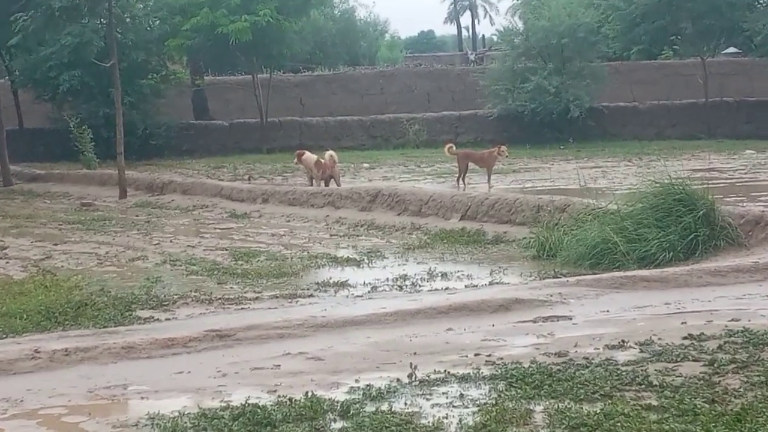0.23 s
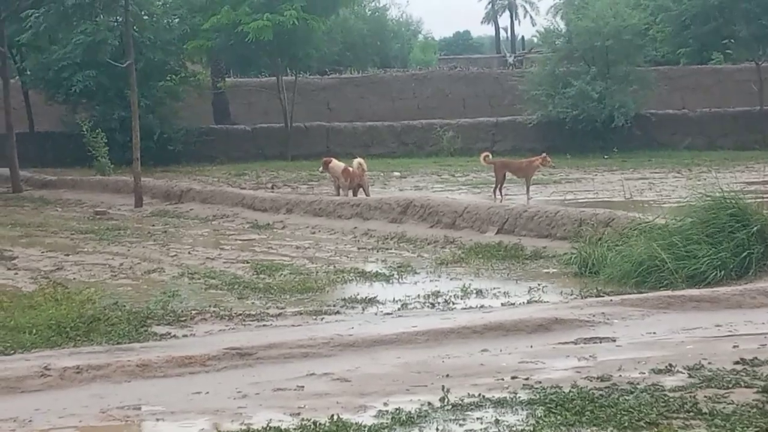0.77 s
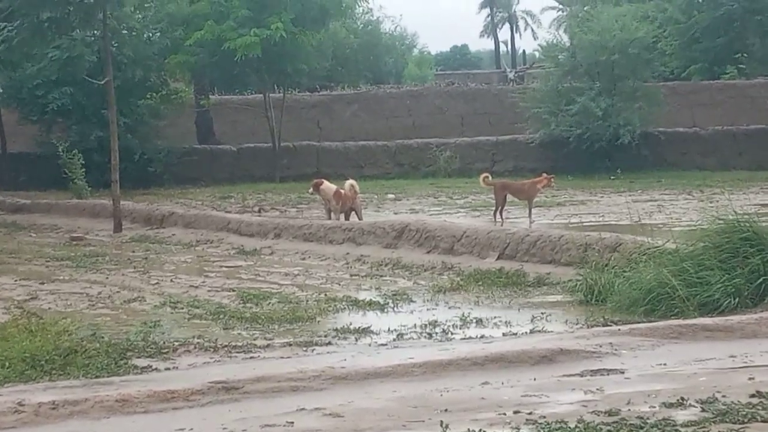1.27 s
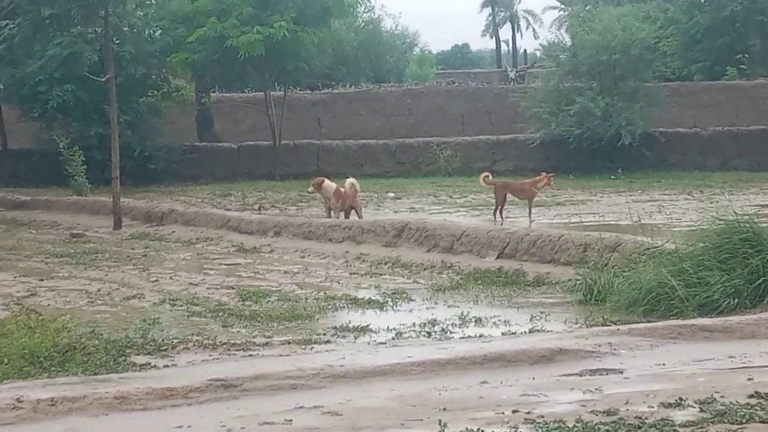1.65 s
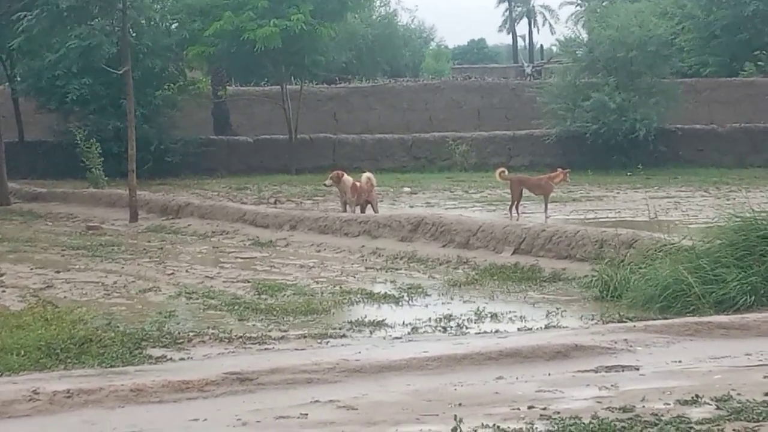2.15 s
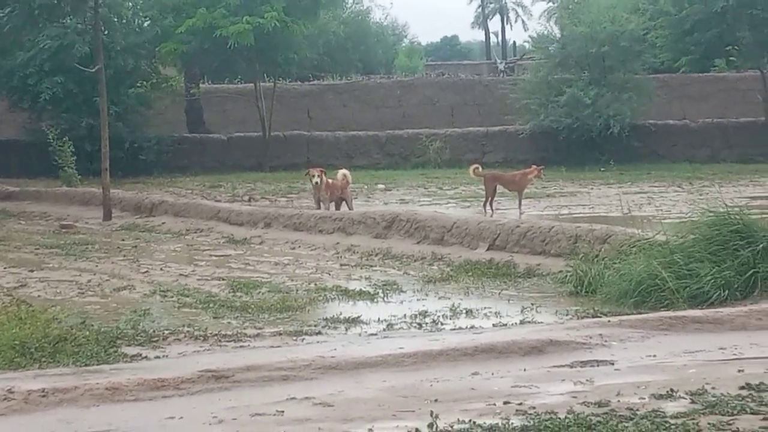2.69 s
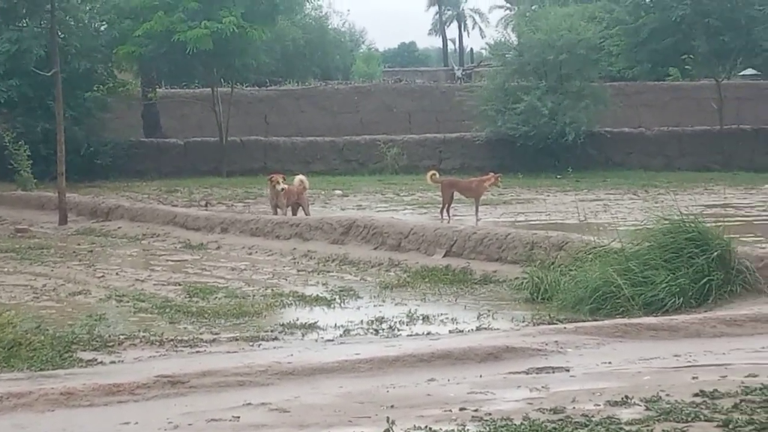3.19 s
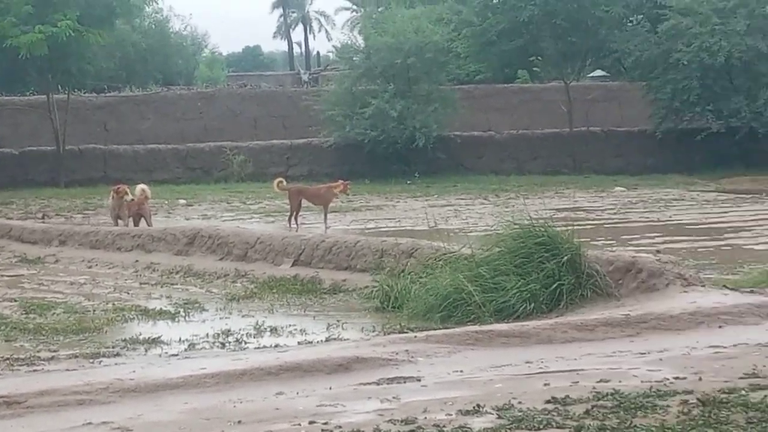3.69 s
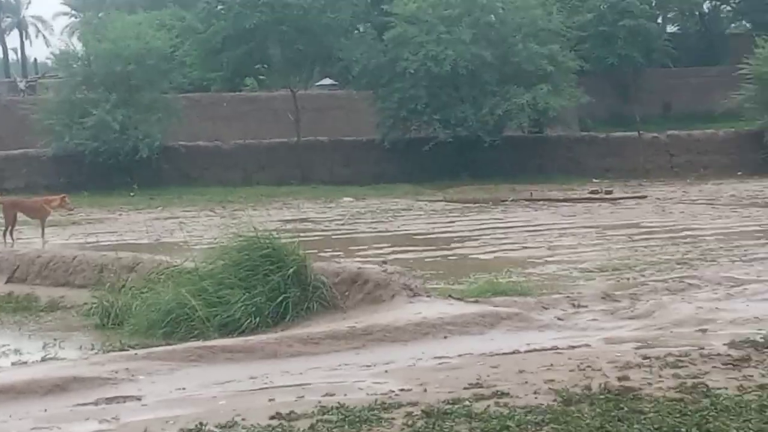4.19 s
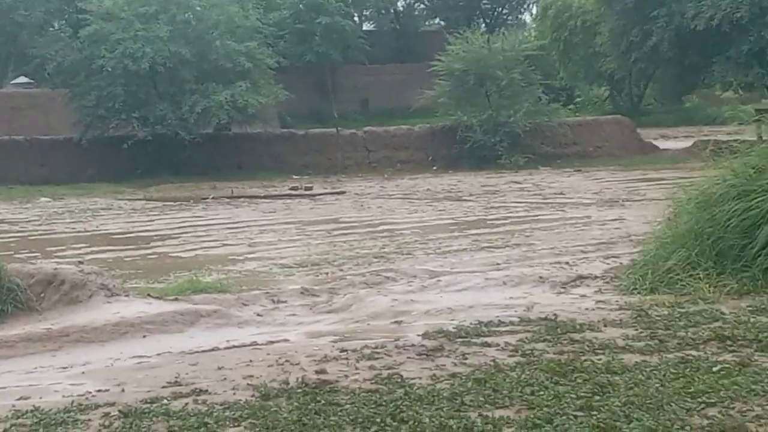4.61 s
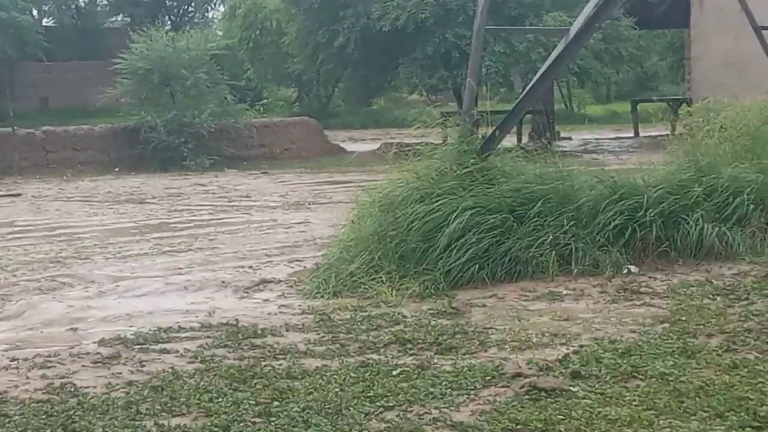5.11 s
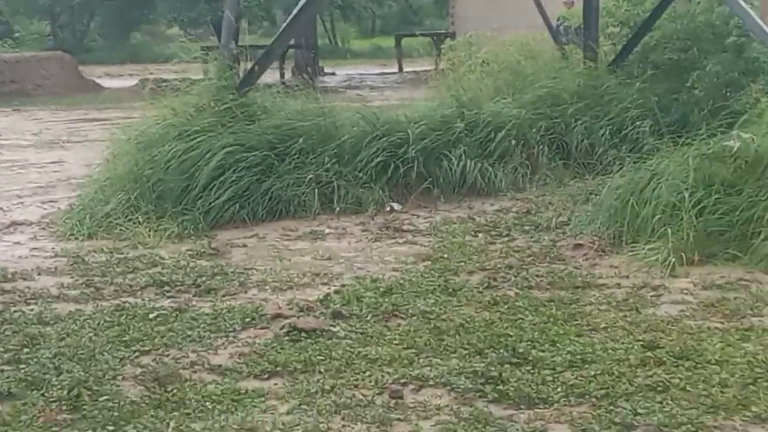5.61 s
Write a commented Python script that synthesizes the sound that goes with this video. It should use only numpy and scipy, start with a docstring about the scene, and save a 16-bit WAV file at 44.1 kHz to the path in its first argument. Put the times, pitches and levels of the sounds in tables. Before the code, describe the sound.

Open countryside with slight echoes: a hoarse crow repeats its caw about every six or seven tenths of a second, while a mellower crow fits between. Quick falling chirps come early, two harsh bird notes midway, and a nasal squeal near the end. Low wind buffets the left channel, popping and ducking the sound when strong; the right stays clearer.

```python
"""Open fields: a crow caws nine times, a second crow calls from farther off and small birds whistle.
Each caw is a fluttering buzz shaped by throat and beak; the whistles are gliding tones with echoes.
Wind, mostly on the microphone's left port, is filtered noise that swells in gusts, with sharp slaps.
Far hoots and a soft airy hiss lie behind. A gain control turns everything down when it gets loud."""
import sys
import numpy as np
from scipy import signal
from scipy.fft import rfft, irfft, next_fast_len
from scipy.io import wavfile
from scipy.ndimage import uniform_filter1d

SR = 44100
rng = np.random.default_rng(int(sys.argv[2]) if len(sys.argv) > 2 else 0)


def transcribe(signal):
    """Save signal, clipped to [-1, 1], as a 16-bit WAV file at the path in sys.argv[1]."""
    frames = np.atleast_2d(signal).T
    limited = np.clip(frames, -1, 1)
    pcm = np.round(limited * 32767).astype(np.int16)
    wavfile.write(sys.argv[1], SR, pcm)


N = 257984
TIME = np.arange(N) / SR   # seconds


def from_db(db):
    """Turn decibels into a gain to multiply by."""
    return 10 ** (np.asarray(db) / 20)


def rms_one(x):
    """Scale to an average strength (rms) of 1."""
    return x / np.sqrt(np.mean(x ** 2) + 1e-20)


def along(rows, at):
    """Read the other columns of a table at places on its first column."""
    first, *columns = np.transpose(rows)
    return [np.interp(at, first, c) for c in columns]


def colour(x, points):
    """Make some pitches louder or softer, following a smooth curve of (f/Hz, level/dB)."""
    size = next_fast_len(x.shape[-1] + 2048)
    hz, db = np.transpose(points)
    bins_hz = np.maximum(np.arange(size // 2 + 1) * SR / size, 1)
    gain = from_db(np.interp(np.log(bins_hz), np.log(hz), db))
    return irfft(rfft(x, size) * gain, size)[..., :x.shape[-1]]


def band(x, low_hz, high_hz):
    """Keep mainly the pitches between two limits."""
    return signal.sosfilt(signal.butter(2, [low_hz, high_hz], "band", fs=SR, output="sos"), x)


def wander(rate_hz, size):
    """A smooth random drift of spread 1: noise with everything faster than the rate softened."""
    low_pass = signal.butter(2, rate_hz, fs=SR, output="sos")
    slow = signal.sosfilt(low_pass, rng.standard_normal(size + 8192))
    return rms_one(slow[-size:])


def delayed(x, seconds):
    """The same sound, later."""
    return np.interp(TIME - seconds, TIME, x, left=0)


def harmonic_buzz(phase):
    """Add 18 harmonics; each swells and sinks on its own and has its own lag in the throat."""
    drift_db, drift_hz, lag_spread = 1.4, 7, .4   # typical depth and rate; lag in radians
    turn = 2 * np.pi * drift_hz * TIME[:len(phase)]
    buzz = 0
    for k, (pace, offset, lag) in enumerate(rng.standard_normal((18, 3)), 1):
        drift = drift_db * np.sin(turn * (1 + pace / 2) + np.pi * offset)
        buzz = buzz + from_db(drift) * np.cos(k * phase + lag_spread * lag)
    return rms_one(buzz)


def caw(length, top_hz, flutter_hz, rough, hoarse):
    """The voice organ buzzes while a slower flutter swings pitch and strength, splitting each harmonic."""
    # pitch through one caw: share of its length, pitch / top pitch
    pitch_arch = [(0, .885), (.12, .94), (.24, .982), (.34, 1), (.44, .998), (.58, .972), (.76, .915),
                  (.9, .865), (1, .825)]
    # effort through one caw: share of its length, level/dB, roughness factor
    caw_arch = [(0, -14.5, 1.17), (.12, -6.5, 2.15), (.26, -2, 0.43), (.38, -1.5, 0.66), (.58, -1.5, 0.72),
                (.76, -2, 1.63), (.9, -4, 2.8), (1, -13.5, 1.3)]
    swing_depth, throb_depth = .112, .27   # flutter in pitch (before roughness) and in strength
    jitter, stumble = .018, .2   # unsteadiness of pitch and of flutter rate, before the unrest
    breath_share = .34   # turbulence, before the unrest
    size = int(length * SR)
    share = np.arange(size) / size
    (ratio,), (level_db, unrest) = along(pitch_arch, share), along(caw_arch, share)
    unrest = np.minimum(unrest * rough * hoarse, 1)   # hoarsest just after the onset and near the end
    flutter_drift, pitch_drift, shimmer = (wander(rate, size=SR)[:size] for rate in (60, 260, 300))

    flutter = 2 * np.pi * np.cumsum(flutter_hz * (1 + stumble * unrest * flutter_drift)) / SR
    swing = swing_depth * min(rough, .5) * (np.sin(flutter) + .3 * np.sin(2 * flutter))
    pitch_hz = top_hz * ratio * (1 + swing + jitter * unrest * pitch_drift)
    phase = 2 * np.pi * np.cumsum(pitch_hz) / SR
    # the breath noise pulses with each cycle of the buzz
    turbulence = breath_share * unrest * (1 + np.cos(phase)) * rng.standard_normal(SR)[:size]
    strength = (1 + throb_depth * np.cos(flutter - .4)) * from_db(2.5 * unrest * shimmer)
    envelope = from_db(level_db) * signal.windows.tukey(size, .06)
    return (harmonic_buzz(phase) + turbulence) * strength, envelope


def crow(caws, throat, easy_flutter_hz, easy_bright_db, easy_rough, hoarse, right_db):
    """Each caw passes the throat; a wider beak lifts the upper tones, weak effort leaves the main one."""
    # above its easy pitch a crow flutters faster, opens its beak wider and gets rougher with each Hz
    easy_hz, flutter_per_hz, bright_db_per_hz, rough_per_hz = 463.3, .35, 0.595, 0.0049
    out = np.zeros(N + SR)
    for start, length, top_hz, db in caws:
        push_hz = top_hz - easy_hz
        bright_db = easy_bright_db + bright_db_per_hz * push_hz
        flutter_hz = easy_flutter_hz + flutter_per_hz * push_hz
        rough = max(easy_rough + rough_per_hz * push_hz, 0)
        source, envelope = caw(length, top_hz, flutter_hz, rough, hoarse)
        beak = [(1550, 0), (2000, .5 * bright_db), (2550, 0.73 * bright_db), (3600, 0.38 * bright_db)]
        full = rms_one(colour(colour(source, throat), beak))
        narrow = colour(full, [(1300, -14), (1650, 2), (1900, -3), (2500, -13)])
        # the beak closes partly toward the end
        closing = np.interp(np.linspace(0, 1, len(full)), [.55, .9], [1, .6])
        opening = np.minimum(envelope, 1) * closing
        voice = (narrow + opening * (full - narrow)) * envelope
        at = int(start * SR)
        out[at:at + len(voice)] += from_db(db) * voice
    return from_db([[0], [right_db]]) * out[:N]


def near_crow():
    """The main crow: strong, hoarse caws with a wide range of throat tones."""
    # its caws: start t/s, length t/s, top pitch f/Hz, level/dB before the effort curve
    caws = [(.17, 0.37, 501.7, -19.5), (.745, 0.35, 492.4, -20.5), (1.365, .30, 494.3, -20.5),
            (1.958, 0.24, 481, -21.5), (2.63, .255, 469.4, -22.5), (3.245, .25, 472, -21),
            (3.945, .265, 466, -22.5), (4.715, .252, 467.2, -23), (5.505, .252, 469.3, -22)]
    # tone of throat and beak: f/Hz, relative level/dB
    throat = [(600, -32), (930, -16.5), (1170, -7.5), (1410, 1), (1600, 7.5), (1800, 4), (2300, -6.5),
              (2600, -8.5), (2850, -23.5), (3400, -23.5), (4400, -17.5), (5300, -26.5), (6600, -14.5),
              (8200, -29), (14000, -85)]
    return crow(caws, throat, easy_flutter_hz=73.4, easy_bright_db=-1.0, easy_rough=.38,
                hoarse=0.92, right_db=-2.5)


def far_crow():
    """The farther crow: softer and less hoarse, with a narrower band of throat tones."""
    # its caws: start t/s, length t/s, top pitch f/Hz, level/dB before the effort curve
    caws = [(.44, 0.3, 452, -28), (1.06, .22, 453, -27.5), (2.17, 0.35, 454.3, -28),
            (2.96, 0.33, 452, -29.5), (4.06, 0.22, 453, -34)]
    # tone of throat and beak: f/Hz, relative level/dB
    throat = [(700, -50), (1350, -27), (1600, -5), (1780, 0), (1950, -5), (2250, -21), (2700, -29),
              (6500, -31), (12000, -55)]
    return crow(caws, throat, easy_flutter_hz=78, easy_bright_db=4, easy_rough=0.48,
                hoarse=0.21, right_db=-8.0)


def whistle(rows, partials, waver):
    """A gliding, slightly unsteady tone, built from sine waves at multiples of its pitch."""
    first, last = max(int(rows[0][0] * SR), 0), min(int(rows[-1][0] * SR), N)
    hz, db = along(rows, TIME[first:last])
    unsteady_hz = hz * (1 + waver * wander(78, size=SR)[:len(hz)])
    phase = 2 * np.pi * np.cumsum(unsteady_hz) / SR
    tone = np.sqrt(2) * sum(from_db(level) * np.sin(round(k) * phase) for k, level in partials)
    return np.pad(tone * from_db(db) * signal.windows.tukey(len(hz), .3), (first, N - last))


def falling_notes(notes, waver):
    """Each note reaches its top pitch at once or after a rise, then slides to the last along a cosine."""
    share, out = np.linspace(0, 1, num=16), 0
    for start, length, top_hz, last_hz, rise, db in notes:
        bend = np.cos(np.pi * (share - rise) / (1 - min(rise, 2 / 3)))
        hz = last_hz + (top_hz - last_hz) * (1 + bend) / 2
        rows = [(start + length * u, f, db) for u, f in zip(share, hz)]
        out = out + whistle(rows, [(1, 0)], waver)
    return out


def swell(centre, length):
    """A bell-shaped rise and fall of height 1."""
    return np.exp(-np.minimum(2 * ((TIME - centre) / length) ** 2, 30))


def small_birds():
    """Pure gliding whistles, one squeal of several partials and harsh notes of band-limited noise."""
    # whistles: start t/s, length t/s, top pitch f/Hz, last pitch f/Hz,
    # share of the length before the top, level/dB
    whistles = [(-.015, 0.079, 2330, 2130, 0, -37), (.04, .075, 4200, 3830, .6, -52),
                (.11, 0.027, 3980, 3520, 0, -43), (.408, 0.031, 3200, 2850, 0, -36.5),
                (.80, 0.05, 4800, 2900, 0, -42), (1.195, 0.1, 6100, 3220, .28, -39.5),
                (1.32, 0.039, 2550, 2170, 0.066, -40), (2.335, .05, 4900, 4250, 0.059, -48)]
    # path of the nasal squeal: t/s, pitch f/Hz, level/dB before the partials' levels
    squeal = [(5.622, 1400, -50), (5.638, 1560, -38), (5.651, 1645, -27), (5.668, 1560, -31),
              (5.688, 1330, -29), (5.708, 1100, -40), (5.74, 950, -52)]
    # its partials: multiple of the pitch, relative level/dB
    squeal_partials = [(2, 7), (3, -9), (4, -5), (5, -14)]
    # harsh notes: middle t/s, width of the swell t/s, f/Hz that sets the noise band, level at the middle/dB
    rasps = [(3.098, .095, 3500, -38.5), (3.24, 0.068, 3120, -43)]
    song = falling_notes(whistles, waver=.01) + whistle(squeal, squeal_partials, waver=.01)
    for middle, length, hz, db in rasps:
        noise = rms_one(band(rng.standard_normal(N), 0.56 * hz, 1.17 * hz))
        song = song + from_db(db) * swell(middle, length) * noise
    return song


def wind_level(port, breeze_db, gust_eddy_db=2.5):
    """Wind on one port in dB: the uneven breeze, plus gusts that rise, hold and drop."""
    # gusts that hit one port: start t/s, length t/s, level/dB before the eddies, port
    gust_list = [(0.525, 0.035, -27, "left"), (0.608, .046, -26.5, "left"), (0.722, .095, -28, "left"),
                 (0.911, 0.024, -18.5, "left"), (1.094, 0.034, -15.5, "left"), (1.15, 0.091, -18.5, "left"),
                 (1.289, 0.094, -14, "left"), (1.437, 0.1, -15, "left"), (1.565, 0.095, -10, "left"),
                 (1.678, 0.037, -24, "right"), (1.717, 0.053, -20, "left"), (1.784, 0.014, -10, "left"),
                 (1.838, 0.018, -23.5, "right"), (1.912, .054, -28.5, "right"),
                 (2.125, 0.05, -20.5, "left"), (2.349, 0.056, -27.5, "right"), (2.379, 0.052, -9.5, "left"),
                 (2.444, 0.05, -7, "left"), (2.632, 0.028, -3.5, "left"), (2.67, 0.045, -8.5, "left"),
                 (2.802, .1, -16, "left"), (2.912, 0.096, -8, "left"), (3.039, 0.024, -15.5, "left"),
                 (3.094, 0.099, -9, "left"), (3.228, 0.091, -14, "left"), (3.422, 0.1, -35, "right"),
                 (3.491, 0.046, -10, "left"), (3.587, 0.047, -10, "left"), (3.671, 0.16, -10, "left"),
                 (3.858, 0.025, -7.5, "left"), (3.923, 0.069, -14.5, "left"), (4.1, 0.083, -14, "left"),
                 (4.257, 0.03, -8, "left"), (4.302, 0.026, -7.5, "left"), (5.132, 0.097, -21, "left")]
    eddy_rate_hz, eddy_db = 20, 3   # small eddies make the breeze uneven
    attack_s, release_s = 0.011, 0.015
    eddies, gusts = wander(eddy_rate_hz, size=N), np.zeros(N)
    for start, length, db, side in gust_list:
        if side == port:
            end = start + length
            corners = [start - attack_s / 2, start + attack_s / 2, end - release_s / 2, end + release_s / 2]
            gusts += from_db(db) * np.interp(TIME, np.sort(corners), [0, 1, 1, 0])
    breeze = from_db(breeze_db + eddy_db * eddies)
    return 20 * np.log10(np.hypot(breeze, gusts * from_db(gust_eddy_db * eddies)))


def buffeting(wind_db, usual_db=-18, evenness=0.9):
    """Eddies rumble on one port as bands of noise whose balance changes with the wind's strength."""
    # rumble: f/Hz, relative level per Hz/dB, extra level/dB for each dB of wind strength
    buffet = [(32, -27, 2), (53, -13.5, -0.65), (79, 1, 0.26), (117, 3, 0.24), (208, -2.5, 0.41),
              (311, -8.5, 0.97), (509, -26.5, 1.18), (770, -44.5, 2.5), (1260, -95, 1)]
    strength_db = np.clip(wind_db - usual_db + 5 * wander(70, size=N), -20, 14)
    edges_hz = 32 * 2 ** np.arange(0, 5.1, .5)   # half-octave bands
    white, rumble = rng.standard_normal((2, N)), 0
    for k, (low, high) in enumerate(zip(edges_hz, edges_hz[1:])):
        db, growth = along(buffet, np.sqrt(low * high))
        noise = band(band(white[k % 2], low, high), low, high)
        rumble = rumble + from_db(db + growth * strength_db) * noise
    # even out the rumble, so that the wind level sets most of its force
    local_power = uniform_filter1d(uniform_filter1d(rumble ** 2, size=900), size=400) + 1e-12
    return from_db(wind_db) * rms_one(rumble / local_power ** (evenness / 2))


def slaps():
    """A small fast eddy pushes the diaphragm one way and then the other, in random order."""
    # hard slaps: middle t/s, level/dB (the peak is 1.7 dB higher), time between the two peaks t/s
    slap_list = [(1.347, -1.5, 0.0015), (1.604, 3.5, 0.0015), (1.638, 1, 0.0019), (1.681, -7.5, 0.0011),
                 (1.795, -3, 0.0012), (2.644, 5, 0.00098), (2.7, 6.5, 0.00095), (2.949, 1, 0.002),
                 (3.529, 6, 0.0017), (3.709, 3, 0.0023), (3.759, 1.5, 0.0014)]
    out = np.zeros(N)
    for s, db, width in slap_list:
        near = slice(int((s - .02) * SR), int((s + .02) * SR))
        u = 2 * (TIME[near] - s) / width
        out[near] += from_db(db) * rng.choice([-1, 1]) * 2 * u * np.exp(-u * u / 2)
    return out


def far_hoots():
    """Faint, low whistled notes that slide down."""
    # hoots: start t/s, length t/s, top pitch f/Hz, last pitch f/Hz,
    # share of the length before the top, level/dB
    hoots = [(4.95, 0.36, 927, 804, 0.058, -57), (5.48, .37, 922, 849, 0.24, -53.5)]
    return falling_notes(hoots, waver=.02)


def distant_air():
    """Distant birds, leaves and microphone hiss blend into one coloured noise that drifts slightly."""
    # tone of the background: f/Hz, relative level per Hz/dB
    air = [(300, -33), (650, -20), (850, -10), (1150, -13), (1400, -11), (1780, 0.5), (2250, 1.5),
           (3000, 0.5), (4000, -5.5), (5200, -7), (6600, 2), (8200, -12.5), (11000, -23.5), (13900, -42.5),
           (15000, -16)]
    level_db = -40.5 + .5 * wander(4.7, size=N)
    return from_db(level_db) * rms_one(colour(rng.standard_normal((2, N)), air))


def field(direct, leaves_db, leaves_t60, tail_db, tail_t60):
    """Add a few echoes, quick scatter from leaves and a thin tail from trees, different at each port."""
    # echoes from the ground, banks and a wall: delay t/s before a random change at each port, level/dB
    echo_list = [(.004, -14), (.009, -15), (.017, -17), (.046, -19)]
    left_lag_s = .00091   # the left port hears it all later
    t, out = TIME[:SR], []
    for side in direct:
        scatter = 0
        for db, t60 in ((leaves_db, leaves_t60), (tail_db, tail_t60)):   # t60: seconds to fade by 60 dB
            dying = rng.standard_normal(SR) * from_db(-60 * t / t60) * (1 - np.exp(-t / 0.014))
            scatter = scatter + from_db(db) * dying / np.linalg.norm(dying)
        echoes = sum(from_db(db) * delayed(side, s * rng.uniform(0.76, 1.1)) for s, db in echo_list)
        out.append(side + echoes + signal.fftconvolve(side, scatter)[:N])
    return np.array([delayed(out[0], left_lag_s), out[1]])


def scene():
    """Birds over the field, the distant background, and wind on both ports."""
    # breeze: t/s, left level/dB, right level/dB, both before eddies and gusts
    breeze = [(0, -35.5, -64), (.3, -45, -67), (.65, -35.5, -63), (1.1, -23.5, -56), (1.5, -28.5, -53),
              (1.9, -36, -35.5), (2.15, -30.5, -47.5), (2.5, -24.5, -39), (3.3, -23.5, -47),
              (4.4, -28, -42.5), (4.7, -23, -55), (5.05, -27, -57), (5.85, -27.5, -57)]
    # the right port is mostly duller: f/Hz, change in level/dB
    right_port = [(700, 1), (1300, -3.5), (1750, -0.5), (2350, -7.5), (2800, -16.5), (3400, -10.5),
                  (4400, -8), (7000, -12.5), (9000, 4), (12000, 3.5), (15000, 2.5)]
    near = field(near_crow() + small_birds(), leaves_db=-8, leaves_t60=.07, tail_db=-20, tail_t60=.35)
    far = field(far_crow() + far_hoots(), leaves_db=-15, leaves_t60=.1, tail_db=-13, tail_t60=.45)
    left, right = near + far + distant_air()
    left_db, right_db = along(breeze, TIME)
    left = left + buffeting(wind_level("left", left_db)) + slaps()
    right = colour(right, right_port) + buffeting(wind_level("right", right_db))
    # the microphone is nearly deaf to the deepest rumble
    high_pass = signal.butter(3, 48, "high", fs=SR, output="sos")
    return signal.sosfilt(high_pass, np.array([left, right]))


def record(dry, threshold_db=-21, squeeze=0.44, release_db_per_s=350):
    """One gain control turns both sides down when the sound is loud; peaks are rounded, the top is cut."""
    cutoff_hz = 15600
    level_db = 10 * np.log10(np.abs(uniform_filter1d((dry ** 2).sum(axis=0), size=600)) + 1e-12)
    # the level reading jumps up at once but falls back at a steady rate
    fall = release_db_per_s * TIME
    held_db = np.maximum.accumulate(level_db + fall) - fall
    gain_db = uniform_filter1d(-squeeze * np.maximum(held_db - threshold_db, 0), size=400)
    rounded = .85 * np.tanh(dry * from_db(gain_db) / .85)
    steep = signal.ellip(10, .1, 90, cutoff_hz, fs=SR, output="sos")
    return signal.sosfilt(steep, rounded)


dry = scene()
out = record(dry)
transcribe(out)
```